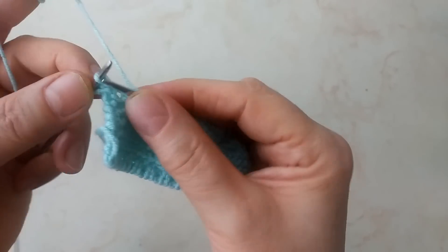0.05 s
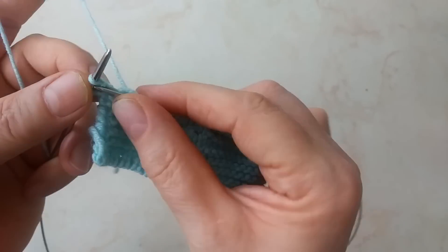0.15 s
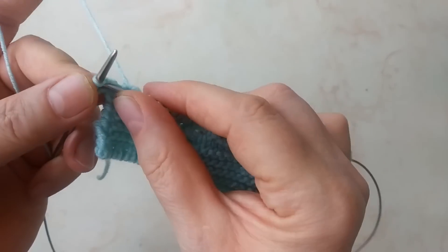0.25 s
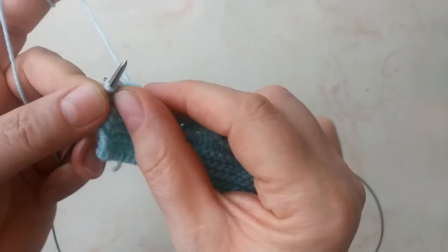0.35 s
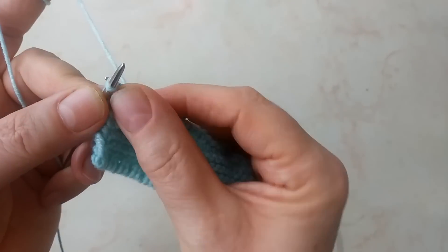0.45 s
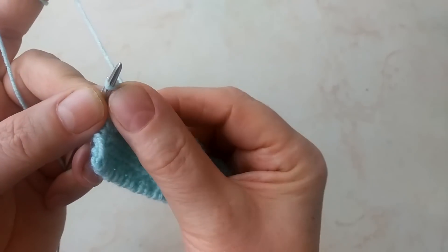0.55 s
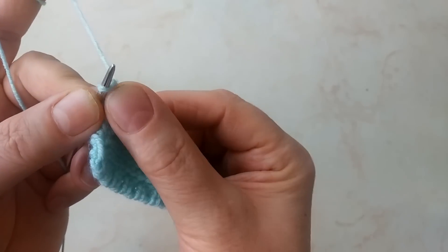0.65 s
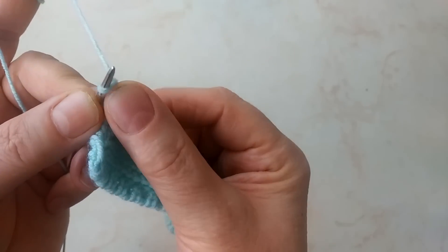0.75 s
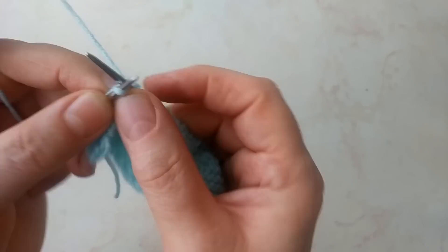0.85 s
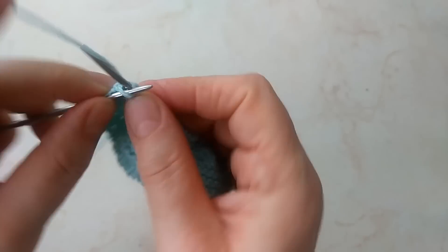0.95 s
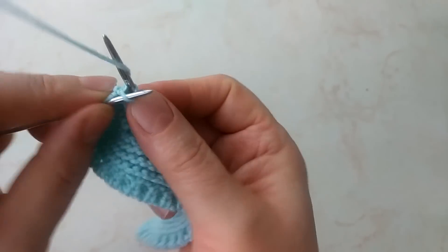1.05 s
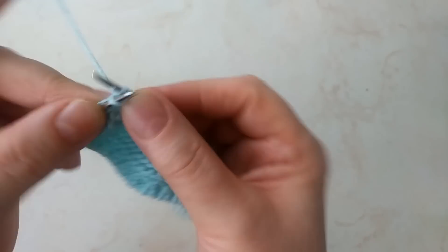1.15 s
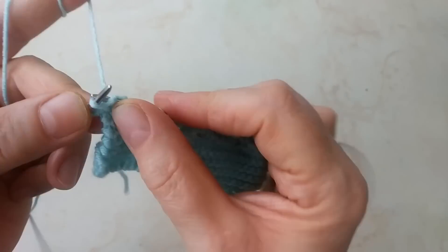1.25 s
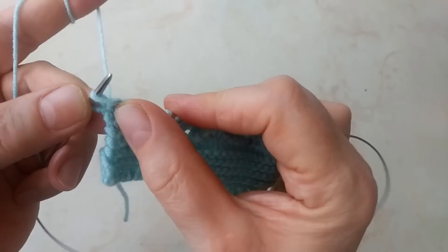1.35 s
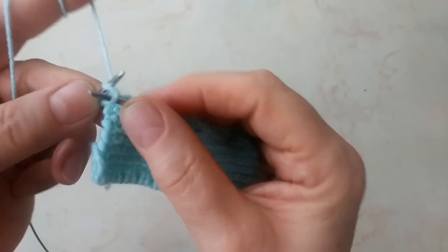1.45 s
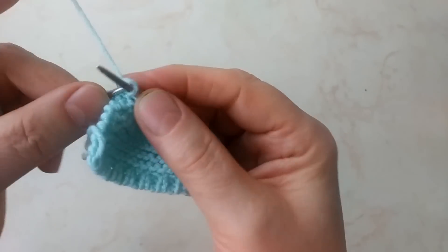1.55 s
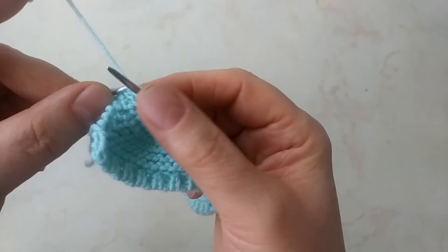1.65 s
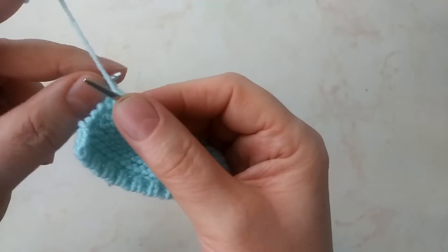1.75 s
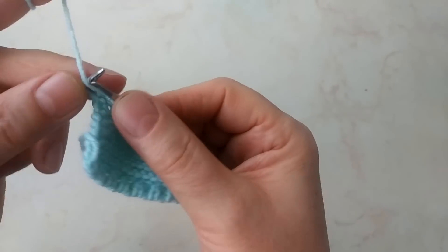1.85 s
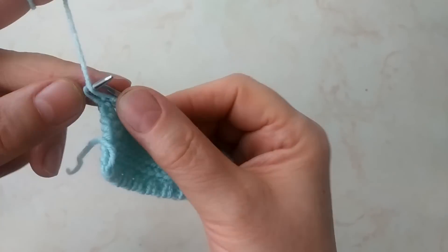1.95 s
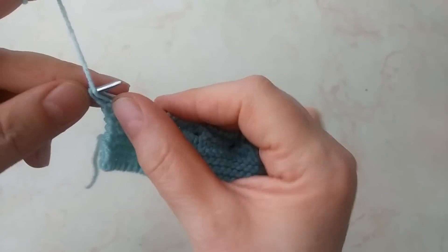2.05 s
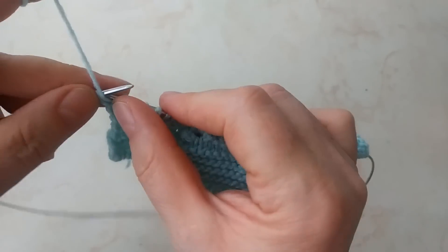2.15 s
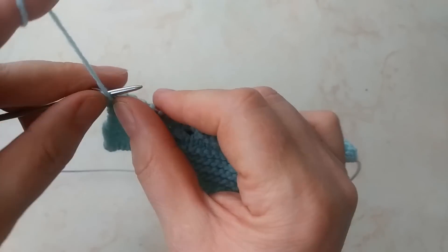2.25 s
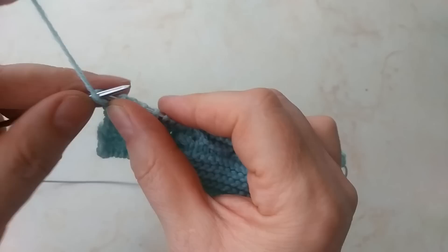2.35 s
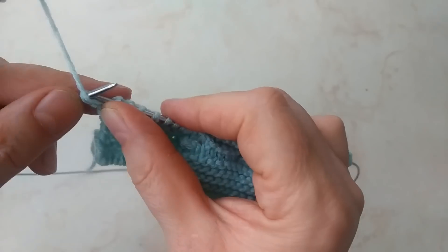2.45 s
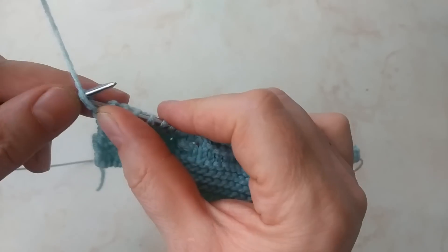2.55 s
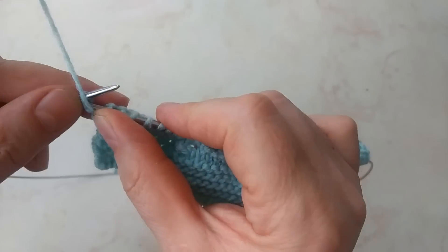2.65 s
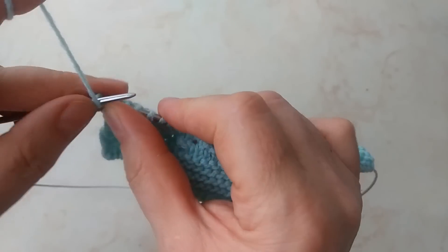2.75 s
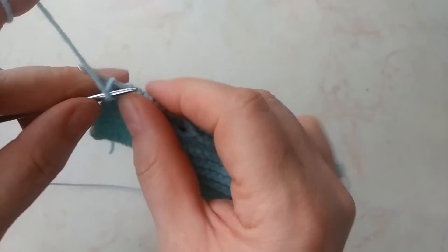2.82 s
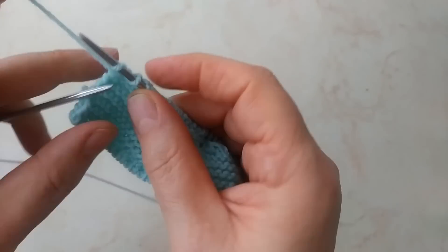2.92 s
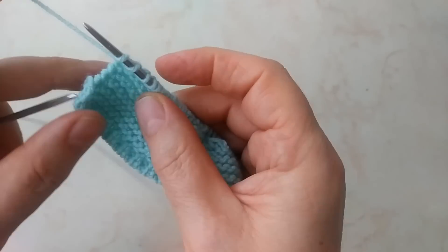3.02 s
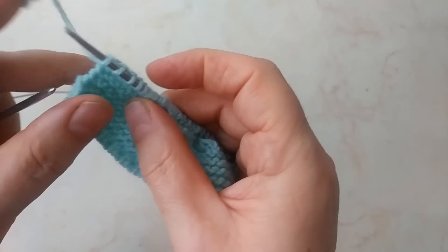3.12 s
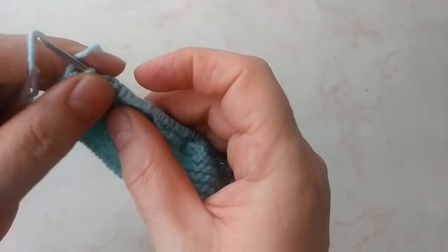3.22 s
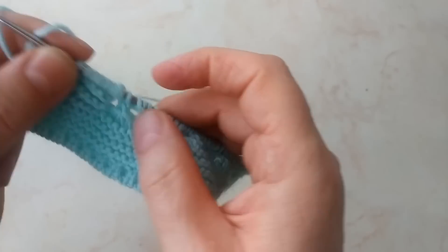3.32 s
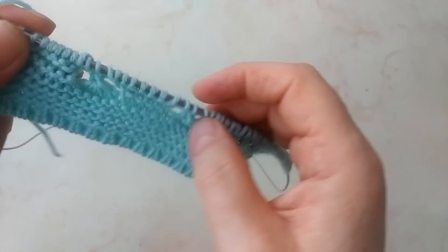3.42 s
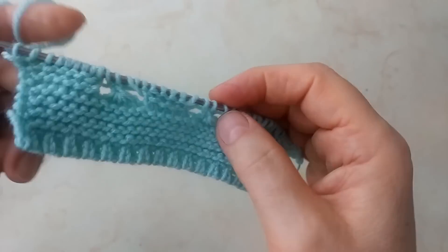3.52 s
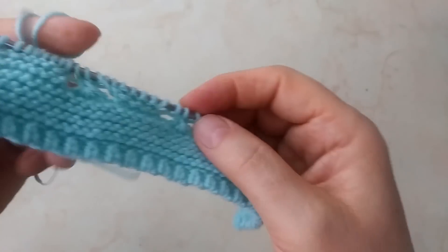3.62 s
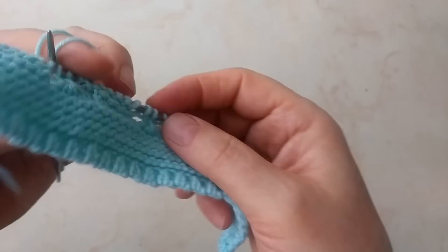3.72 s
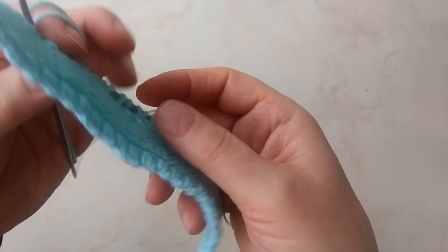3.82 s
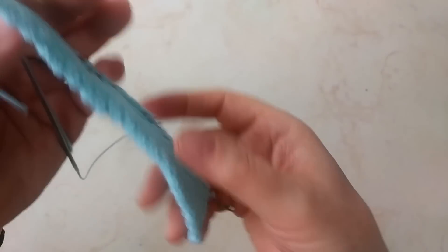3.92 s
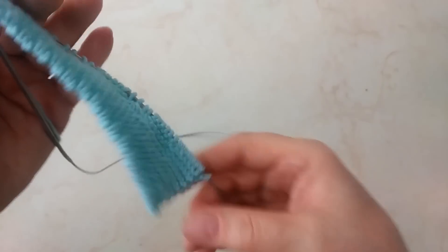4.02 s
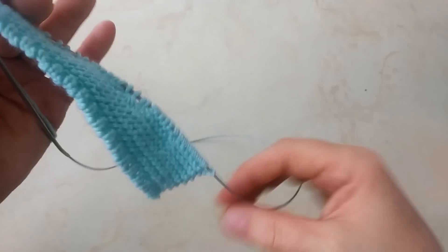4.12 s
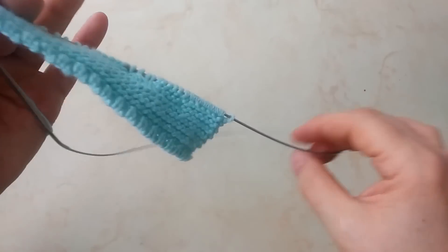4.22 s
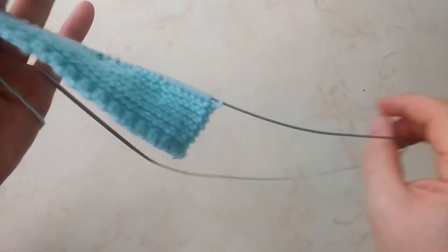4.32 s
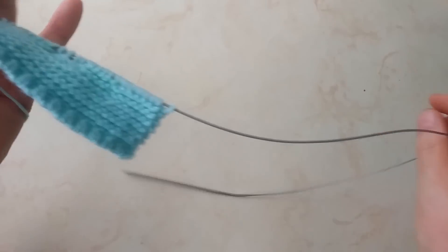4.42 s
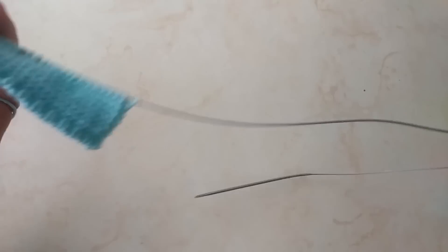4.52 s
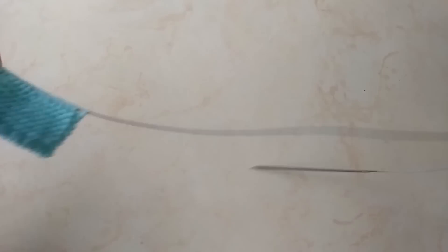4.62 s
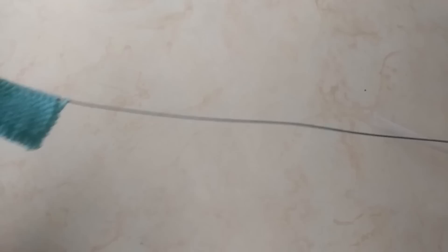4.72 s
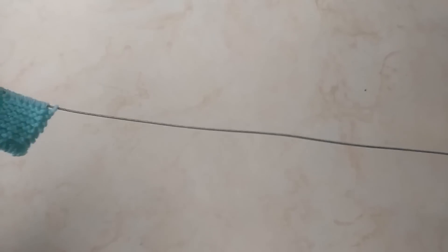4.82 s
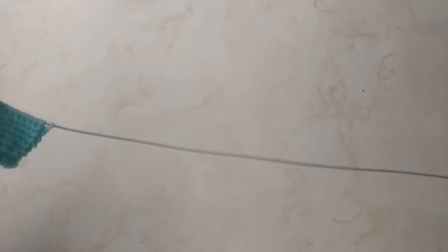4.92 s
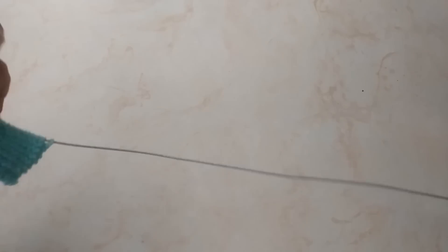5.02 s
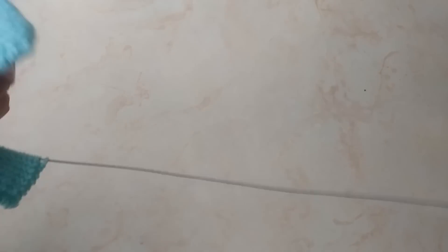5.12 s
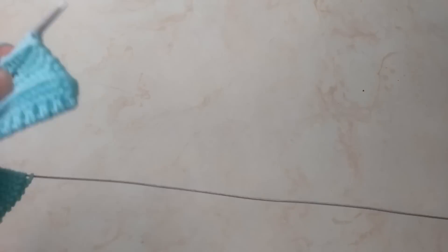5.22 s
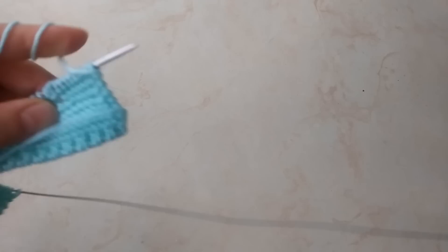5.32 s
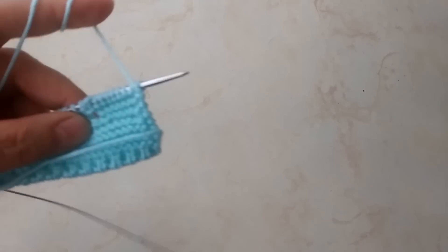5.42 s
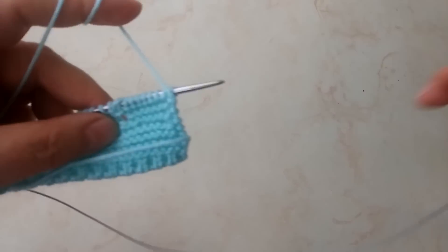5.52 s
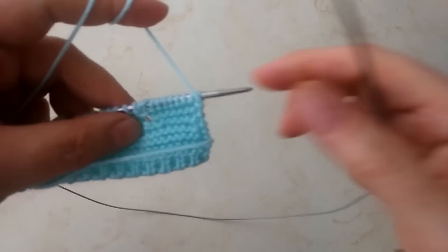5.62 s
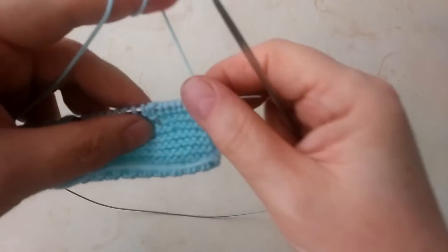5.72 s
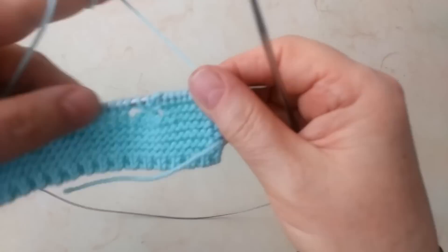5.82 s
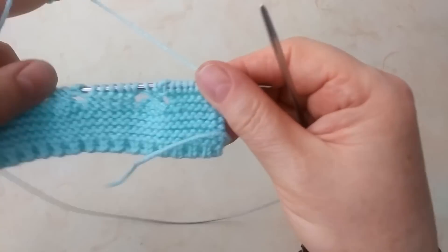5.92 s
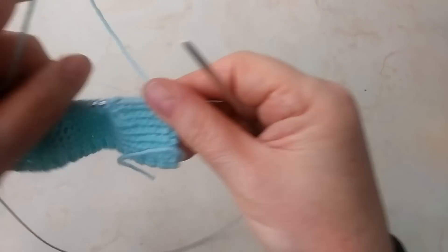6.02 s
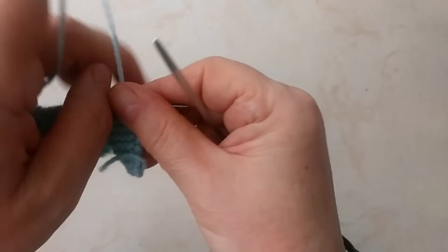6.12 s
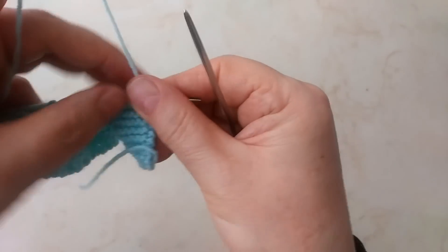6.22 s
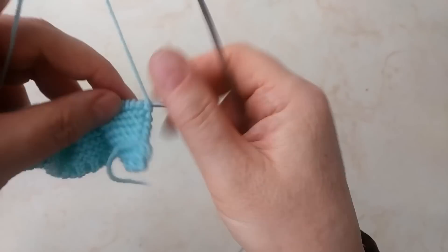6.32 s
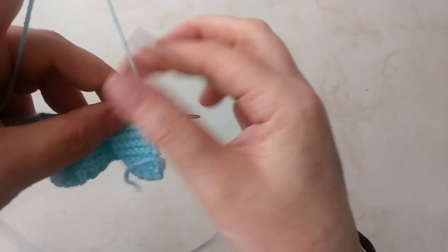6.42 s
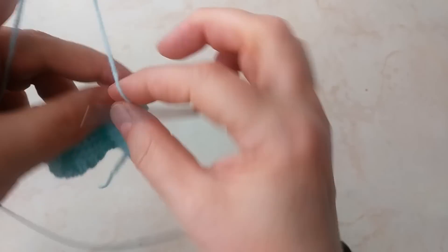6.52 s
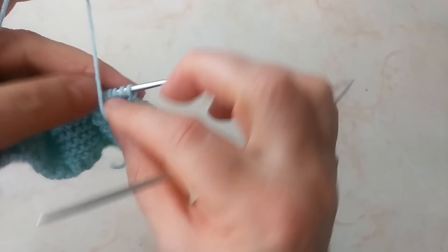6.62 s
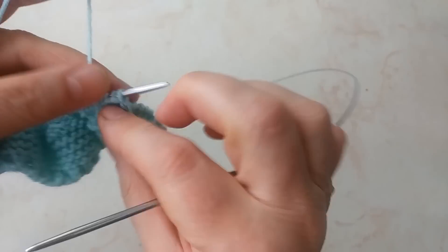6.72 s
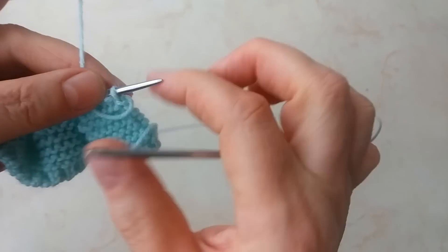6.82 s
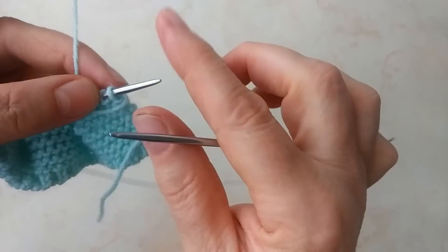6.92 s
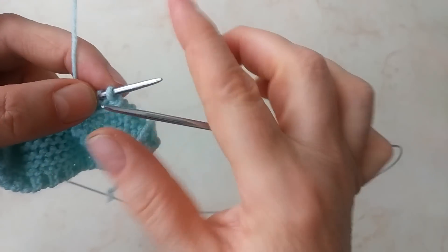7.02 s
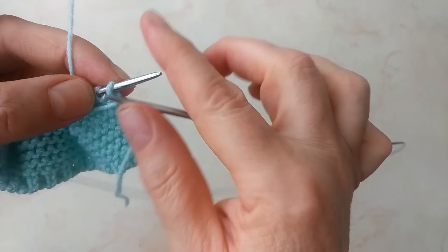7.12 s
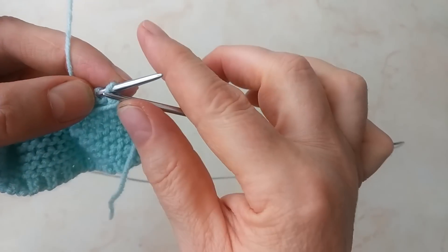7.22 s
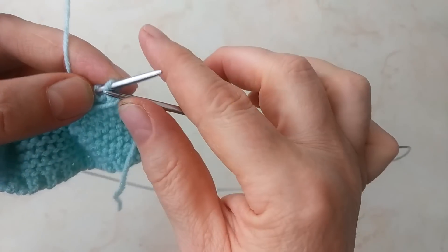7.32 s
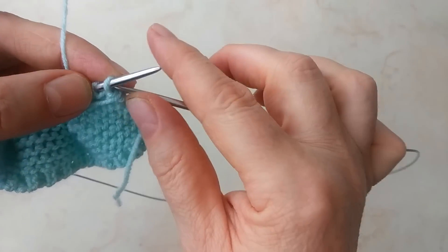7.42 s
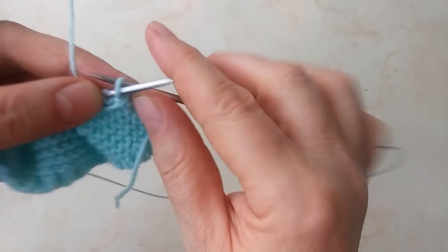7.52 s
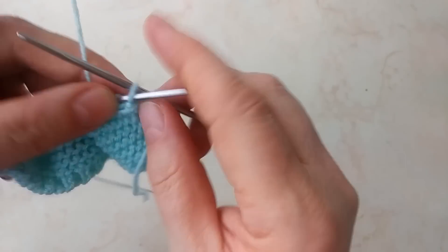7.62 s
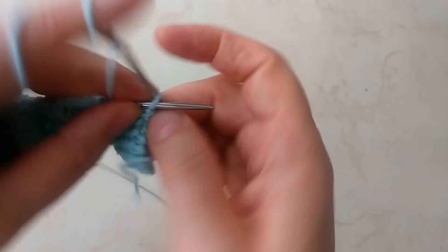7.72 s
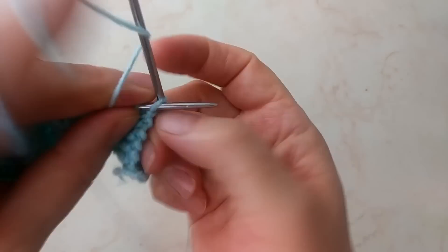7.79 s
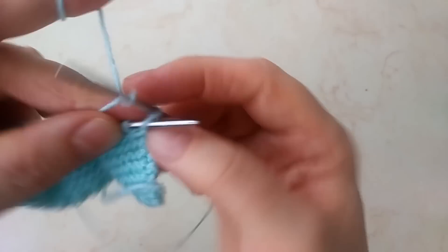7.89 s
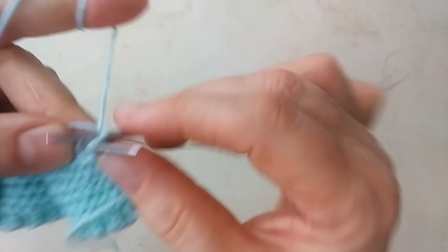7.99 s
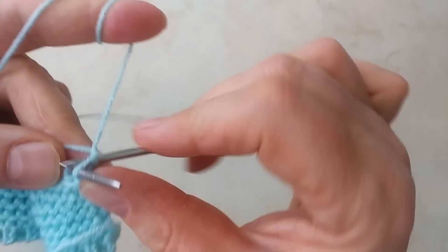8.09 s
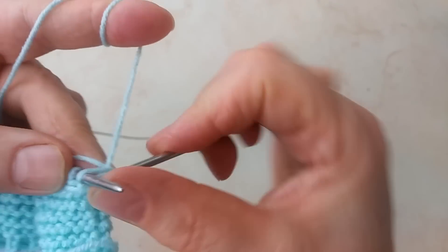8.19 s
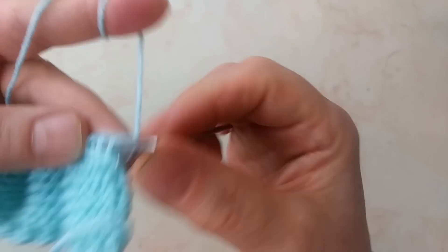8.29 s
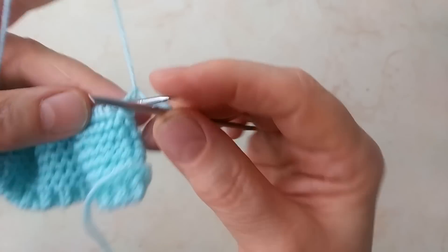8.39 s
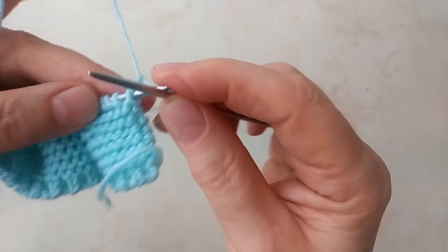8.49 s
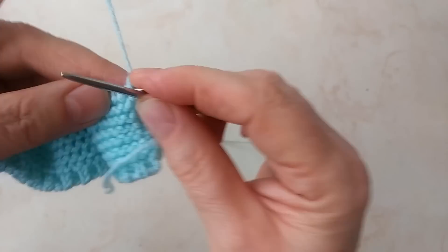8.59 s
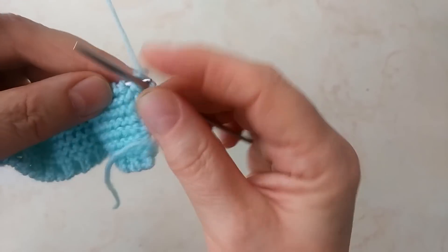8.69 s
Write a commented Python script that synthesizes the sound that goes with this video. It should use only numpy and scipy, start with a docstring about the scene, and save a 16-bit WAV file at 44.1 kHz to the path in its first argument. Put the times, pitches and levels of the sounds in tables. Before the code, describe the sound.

Close, quiet knitting in a small room with a low steady hum. Soft grainy yarn rubs and faint metallic clicks come first. Midway a free steel needle tip drops on the table with a sharp, ringing clatter, far louder than the rest, bounces and is dragged off with a thin hollow scrape. After a near-quiet pause, a short creak of rapid ticks leads back to rubbing, clicks and snapping stitches.

```python
"""Knitting on a circular metal needle above a table, in a small room with a low steady hum throughout.
First yarn rubs along the needle as filtered grainy noise, and the tips snap and click as short bursts.
Then the free tip drops on the table with ringing blows, bounces, and is dragged away by its cable: a
scrape with a comb-like echo. Last the cable creaks through the stitches in a run of fast ticks, as they
are pushed along, and the knitting goes on."""
import sys
import numpy as np
from scipy import signal
from scipy.fft import rfft, irfft
from scipy.io import wavfile
from scipy.ndimage import uniform_filter1d

SR = 44100
rng = np.random.default_rng(int(sys.argv[2]) if len(sys.argv) > 2 else 0)


def to_wav(sig):
    """Store sig (one row per channel, or 1-D mono) as 16-bit WAV at the path in sys.argv[1].

    Samples outside -1..1 are clipped; the rate is SR.
    """
    pcm = np.clip(np.atleast_2d(sig), -1, 1) * 32767
    pcm = np.round(pcm).astype(np.int16)
    wavfile.write(sys.argv[1], SR, pcm.T)  # frames by channels


N = 385875
TIME = np.arange(N) / SR  # s

# All levels in the tables are relative: the layers add their own gain.
# tip meets tip: [t/s, level/dB, brightness/dB per octave, left-right/dB, room/dB]
CLICKS = [(.6045, -36.5, -6, 1, -9), (1.1187, -28.5, 2, 5, 9), (1.1205, -30.5, 1, -18, -3),
          (1.2656, -29.5, 5, 1, 1), (1.2705, -32, -3, -1, -1), (2.2885, -37, 1.5, 15, 0.5),
          (2.2898, -37, 0, -16, 3), (2.7945, -32, 0.5, -2, 3.5), (3.126, -37, -2, 0, 5),
          (5.5107, -28.5, 8, 6, 3), (5.5125, -32, 1, -4, 5), (6.157, -38.5, 4, 0, 5.5),
          (6.3375, -30.5, -0.5, 0, 1.5), (7.5335, -28, -1, -3, 2), (8.165, -39.5, -3, -2, 3.5),
          (8.1695, -41, -6, 8, -6)]
# short resonances of a needle held in the fingers: [f/Hz, width/Hz, lift or cut/dB]
HELD = [(1750, 160, 3.5), (2390, 250, 3.5), (4860, 280, -4.5), (5350, 300, 0), (7500, 400, 5),
        (8300, 230, 7), (9900, 400, 5.5), (10900, 230, 5)]
# a stitch slips over a tip: [t/s, level/dB, brightness/dB per octave, left-right/dB, chatter after it/dB]
SNAPS = [(0.0944, -38, 1, 3, -20), (1.956, -35, 4, 8, -20), (3.9434, -52, 0, 0.5, -20),
         (4.118, -46, -2, 5, -20), (5.0012, -40, 2, 2, -20), (6.758, -36.5, 8, 1, -18),
         (7.418, -32, 7, -1, -13), (7.957, -32.5, 6, 0, -7), (8.2294, -37.5, 2, 1, -2),
         (8.372, -27, 16, 4, -6)]
# one pull of yarn along a needle: [t/s at its fastest, speeding up/s, slowing down/s, hiss level/dB,
# body relative to the hiss/dB, centre of the body f/Hz]
PULLS = [(.015, 0.11, 0.093, -57, -4.5, 2800), (.455, 0.081, .083, -66, 3.5, 2430),
         (.78, 0.006, 0.11, -67.5, 4, 2920), (.865, 0.082, 0.16, -59, -2, 3460),
         (.965, 0.055, 0.031, -54, -5.5, 3470), (1.44, 0.15, 0.18, -58.5, -4, 2700),
         (1.79, 0.068, 0.032, -67.5, 1, 2800), (1.96, 0.057, 0.044, -61.5, 1.5, 3230),
         (2.08, 0.079, 0.044, -52, -7, 2760), (2.925, 0.018, 0.043, -71, 5, 3400),
         (2.98, 0.11, 0.08, -57.5, 1, 3600), (3.025, 0.06, 0.035, -54.5, -2.5, 2490),
         (3.335, 0.19, 0.084, -61.5, -7.5, 2780), (3.53, 0.046, 0.16, -68, 1, 2700),
         (3.84, .15, .08, -71.5, 1.5, 2470), (3.95, 0.063, 0.043, -61.5, -0.5, 2820),
         (4.055, 0.021, .019, -64.5, 2, 3000), (4.125, 0.025, 0.016, -61, -3, 2430),
         (4.32, 0.045, .03, -68, -31, 3000), (5.895, 0.2, 0.054, -65.5, -6, 3200),
         (5.98, 0.058, 0.096, -57.5, -10, 2600), (6.098, 0.024, 0.026, -65.5, 4, 2300),
         (6.495, 0.053, 0.027, -58, -3.5, 2700), (6.695, 0.017, .02, -63, -30, 3000),
         (7.5, 0.048, .03, -59, -22, 3000), (7.555, 0.019, 0.047, -64, -4, 2200),
         (7.715, 0.065, 0.083, -51, -7.5, 2840), (7.885, 0.057, 0.052, -50.5, -2.5, 3850),
         (8.31, 0.073, 0.051, -58.5, -2, 2520), (8.495, 0.05, 0.04, -58, -3, 2320),
         (8.68, 0.13, 0.31, -61.5, -1, 2670)]
# a needle sings as the other slides on it: [t/s at its fastest, speeding up/s, slowing down/s, level/dB, f/Hz]
SINGS = [(.46, .04, .05, -64.5, 2950), (.795, .025, .1, -66.5, 3100), (.97, .04, .04, -66.5, 2980),
         (3.025, .03, .035, -66, 2600), (6.105, .03, .04, -65.5, 2020), (8.495, .03, .05, -66, 2830),
         (8.5, .03, .05, -68, 2030)]
# one scrape of steel on steel just after a click: [t/s at its fastest, speeding up/s, slowing down/s, level/dB]
SCRAPE = (1.155, .035, .05, -49)
# one pull of the cable through the stitches: [t/s at its fastest, speeding up/s, slowing down/s, level/dB]
CREAK = (5.887, .036, .028, -32)
# the free tip lands flat and rattles: [t/s, level/dB, brightness/dB per octave, left-right/dB, room/dB]
DROPS = [(4.3648, -28, 2, -2, 4), (4.3729, -22, 1, 4, 1), (4.3828, -15, 4, 6, -2), (4.3855, -9, 0, 1, 0),
         (4.3861, -11, 2.5, -3, 2.5), (4.3872, -16.5, 1.5, -6, 3), (4.3883, -13.5, -.5, -4, 5),
         (4.3913, -19, 3, 2, -2), (4.3965, -21, -3, -2, 0), (4.411, -20, 0, -2, -3),
         (4.4295, -25, -1, 1, -4), (4.4465, -27, -1, -1, -4)]
# balance of the landing, band by band: [f/Hz, left-right/dB]
DROP_LEAN = [(500, 0), (1200, 1), (2800, -1), (5000, -3), (9000, .5), (13000, 4)]
# the tip bounces before it settles: [t/s, level/dB, brightness/dB per octave, left-right/dB, room/dB]
BOUNCES = [(4.5098, -2.5, 4.5, 9, -4), (4.5256, -8, 2, 7, -6), (4.5268, -16, 0, -3, -6),
           (4.5360, -21, 0, 4, -6), (4.5637, -11.5, 2, 3, -9), (4.580, -18, 0, 2, -8),
           (4.6268, -22, -1, 1, -8)]
# the tip dragged over the table: [t/s, level/dB, delay of its echo off the table/ms]
SLIDE = [(4.508, -36, .55), (4.55, -37, .55), (4.58, -40.5, .55), (4.61, -40, .53), (4.65, -35.5, .59),
         (4.69, -35, .58), (4.708, -37, .6), (4.74, -49, .6), (4.79, -78, .6)]
# ringing of a steel tip: [f/Hz, level/dB, t60/s]
TIP = [(1897, -8, .45), (1933, -8.5, .45), (2300, -7, .4), (2943, -9, .35), (3345, -6, .35),
       (3516, -9, .35), (4554, -8, .25), (5125, -8, .2), (5500, -8, .3), (7090, 2, .11), (8441, -9, .25),
       (8805, -5, .22), (9106, -7, .22), (10025, -6, .22), (11120, -6, .13), (12840, 8, .11)]
# colours of steel on steel, snaps, landing, bounces and sliding: [f/Hz, level/dB]
CLICK_COLOUR = [(200, -16), (900, -0.5), (2000, 2), (4500, 7.5), (8000, 3.5), (12000, 3.5), (15500, 3.5),
                (18000, -13)]
SNAP_COLOUR = [(200, -19), (1000, -9), (2500, -26), (5000, -3.5), (8000, -0.5), (12500, -6), (15500, -3),
               (18000, -26)]
DROP_COLOUR = [(50, -9), (115, 6), (220, 6.5), (400, 2), (900, -3.5), (2000, 1.5), (3400, 2.5), (4200, 3),
               (5500, 4.5), (7200, 4.5), (10000, 2), (11400, 0.5), (12100, 3), (12900, 3.5), (14200, -7),
               (16500, 6)]
BOUNCE_COLOUR = [(300, -6), (900, -6), (1800, -10), (4200, -20), (5800, -12), (7500, -12.5), (9200, -3),
                 (10200, -6), (11200, -8), (12100, 7), (12900, 0), (13800, -8), (15400, 4)]
SKATE_COLOUR = [(300, -19), (900, -19), (1700, -10.5), (3200, -7.5), (4200, -5), (5000, -6.5), (6200, -7),
                (7800, -1.5), (9300, -8.5), (10200, -6), (11250, 6.5), (12400, -1), (13700, -7), (15300, 3),
                (17000, 4.5)]
# colours of the yarn, its fine hiss and the source of its body: [f/Hz, level/dB]
YARN_HISS = [(1500, -41), (3000, -11), (4500, 1.5), (7500, 1.5), (11000, -2.5), (16000, -5)]
YARN_BODY = [(300, -2), (3000, -8.5), (16000, 5.5)]
# reverberation of the room: [f/Hz, t60/s]
ROOM = [(200, 0.1), (1000, 0.53), (3000, 0.47), (7000, 0.27), (12000, 0.27), (16000, 0.018)]
# tones of the hum: [f/Hz, level/dB, share that wavers 0-1]
HUM = [(29.4, -70, 1), (48.7, -62, 0.84), (96.5, -73, 0.8), (124, -68, 0.87), (173.8, -70, 1),
       (199, -62, 0), (254.6, -67, 0.4), (346, -72.5, 0.53), (362.8, -69, 0.83), (382, -65.5, 0.85),
       (471.4, -74.5, 0.84), (517.7, -71.5, 0.96)]
# room noise common to both sides, and differing between them: [f/Hz, level/dB]
AIR = [(10, 6), (22, 3), (45, -0.5), (85, -7.5), (140, -5), (220, -2.5), (300, -5.5), (380, -7.5),
       (550, -9), (750, -15.5), (1400, -23.5), (3000, -29), (12000, -30.5), (16000, -32)]
AIR_SIDE = [(10, 5), (25, -1), (100, -12), (250, -9), (550, -12), (1000, -19), (2000, -24.5), (5000, -29),
            (12000, -28.5), (16000, -30.5)]

STROKE_DEPTH_DB, STROKE_ROUNDNESS = 16.5, 1.78  # every stroke swells from this far below its top, in one arch
BODY_Q = .9  # sharpness of each of the two filters that shape the body of a rub
SING_WIDTH_HZ = 170  # width of each of the two filters that make a needle sing, damped by the fingers
SLIPS_PER_S = 490  # slips of the cable at its fastest moment
TABLE_ECHO = .65  # share of the direct sound
MERGE_S = .04  # time that the reflections need to merge into a smooth tail
EDGE_HZ = 15850  # top of the band that is heard


def yarn(hiss_db=-1, body_db=2.0, pan_db=-1):
    """Fibres drag over steel: a fine hiss, and a soft body whose pitch differs from pull to pull."""
    fizz = friction(YARN_HISS, grains_per_s=900, alike=1.1, patchy_db=2.6, jerk_db=1.8)
    fibres = friction(YARN_BODY, grains_per_s=600, alike=1.0, patchy_db=2.2, jerk_db=2)
    rub = np.zeros((2, N))
    for s, rise_s, fall_s, db, dull_db, body_hz in PULLS:
        stroke = swell(s, rise_s, fall_s, db)
        near = stroke > 0
        body = resonate(fibres[:, near], body_hz, BODY_Q)
        rub[:, near] += stroke[near] * (amp(hiss_db) * fizz[:, near] + amp(dull_db + body_db) * body)
    return sides(pan_db) * (rub + amp(-3.5) * room(rub))


def clicks():
    """Tip strikes tip: a short crack, a trace of ringing steel and the room's answer."""
    return amp(6.5) * blows(CLICKS, CLICK_COLOUR, ring_db=-49, crack_s=.0002, chatter_db=-15, chatter_s=.004)


def snaps(level_db=6, room_db=-10):
    """A stitch slips over a tip: very short ticks, close by and nearly dry."""
    out, t = np.zeros((2, N)), np.arange(SR // 25) / SR
    for s, db, tilt_db, pan_db, chatter_db in SNAPS:
        burst = contact(t, crack_s=.0007, chatter_db=chatter_db, chatter_s=.005)
        add(out, s, amp(db + level_db) * sides(pan_db) * causal(burst, SNAP_COLOUR, tilt_db))
    return out + amp(room_db) * room(out)


def singing(level_db=0, room_db=-5):
    """Catches of steel on steel excite one narrow resonance, whose pitch depends on where the fingers grip."""
    catches = friction(YARN_BODY, grains_per_s=400, alike=1.2, patchy_db=2, jerk_db=2)
    out = np.zeros((2, N))
    for s, rise_s, fall_s, db, hz in SINGS:
        stroke = swell(s, rise_s, fall_s, db + level_db)
        near = stroke > 0
        out[:, near] += stroke[near] * resonate(catches[:, near], hz, hz / SING_WIDTH_HZ)
    return out + amp(room_db) * room(out)


def scrape(room_db=-3, pan_db=1):
    """One tip scrapes along the other: dense steel catches under a single stroke."""
    steel = friction(CLICK_COLOUR, grains_per_s=3300, alike=.55, patchy_db=2.5, jerk_db=1.5)
    rub = swell(*SCRAPE) * steel
    return sides(pan_db) * rub + amp(room_db) * room(rub)


def cable(level_db=4.5, tilt_db=1, room_db=-5):
    """The cable sticks and slips: the slips speed up and slow down again, and faster ones are stronger."""
    strength = swell(*CREAK)
    speed = np.sqrt(strength / strength.max())
    slips_so_far = np.floor(np.cumsum(SLIPS_PER_S * speed) / SR)
    run, t = np.zeros((2, N)), np.arange(SR // 100) / SR
    for at in np.flatnonzero(np.diff(slips_so_far)):
        burst = contact(t, crack_s=.00018, chatter_db=-22, chatter_s=.001)
        add(run, at / SR, amp(level_db) * strength[at] * causal(burst, SNAP_COLOUR, tilt_db))
    return run + amp(room_db) * room(run)


def landing():
    """The free tip hits the table and rattles: full blows with ringing steel, each band leaning to one side."""
    drops = blows(DROPS, DROP_COLOUR, ring_db=-37, crack_s=.0005, chatter_db=-9, chatter_s=.003)
    return leaning(amp(11) * drops, DROP_LEAN)


def bounces():
    """The tip bounces before it settles: drier blows, hollowed by the echo off the table."""
    hops = blows(BOUNCES, BOUNCE_COLOUR, ring_db=-55, crack_s=.0005, chatter_db=-16, chatter_s=.004)
    return table_echo(amp(7) * hops)


def skate(room_db=-8, pan_db=0):
    """The fallen tip skates away, catching unevenly on the table."""
    s, db, _ = np.transpose(SLIDE)
    catches = friction(SKATE_COLOUR, grains_per_s=1800, alike=.8, patchy_db=2.3, jerk_db=1.6)
    slide = table_echo(envelope(s, db) * catches)
    return sides(pan_db) * slide + amp(room_db) * room(slide)


def hum(air_db=-56.0, side_db=-60.0, pan_db=-1.0):
    """Motor and mains tones, most of them wavering, in the steady noise of the room."""
    tones, slow_t = np.zeros(N), np.arange(1024) / 100
    # slow complex noise, mostly below 6 Hz, moves the strength and phase of each tone
    drift_band = 1 / (1 + (np.fft.fftfreq(len(slow_t), slow_t[1]) / 6) ** 2)
    for hz, db, share in HUM:
        share = np.clip(share, 0, 1)
        drift = unit(np.fft.ifft(drift_band * np.exp(2j * np.pi * rng.random(len(slow_t)))))
        strength = np.interp(TIME, slow_t, np.sqrt(1 - share) + np.sqrt(share) * drift)
        carrier = np.exp(2j * np.pi * (hz * TIME + rng.random()))
        tones += amp(db) * np.sqrt(2) * (strength * carrier).real
    mid = tones + amp(air_db) * coloured(rng.standard_normal(N), AIR)
    side = amp(side_db) * coloured(rng.standard_normal(N), AIR_SIDE)
    return sides(pan_db) * np.array([mid + side, mid - side])


def blows(rows, colour, ring_db, crack_s, chatter_db, chatter_s):
    """Each blow cracks, rings the steel tip and sets off the room."""
    out, t = np.zeros((2, N)), np.arange(SR // 2) / SR
    impulse = np.tile(signal.unit_impulse(len(t)), (2, 1))
    for s, db, tilt_db, pan_db, room_db in rows:
        ring = np.zeros((2, len(t)))
        for hz, mode_db, t60 in TIP:
            phase = rng.uniform(0, 2 * np.pi, (2, 1))
            ring += amp(mode_db - 60 * t / t60) * np.sin(2 * np.pi * hz * t + phase)
        direct = contact(t, crack_s, chatter_db, chatter_s) + amp(ring_db) * ring
        # the reverberation comes from all around, so it leans less to one side
        heard = direct * sides(pan_db) + amp(room_db) * room(impulse) * sides(pan_db / 2)
        add(out, s, amp(db) * causal(heard, colour, tilt_db))
    return out


def contact(t, crack_s, chatter_db, chatter_s):
    """One crack for both sides, with the fainter chatter of the surfaces and their nearest reflections."""
    crack = np.exp(-t / crack_s)
    chatter = amp(chatter_db) * np.exp(-t / chatter_s)
    burst = crack * rng.choice([-1., 1.], len(t)) + chatter * rng.standard_normal((2, len(t)))
    return burst / np.linalg.norm(np.hypot(crack, chatter))


def friction(colour, grains_per_s, alike, patchy_db, jerk_db):
    """Tiny catches over a smooth hiss; the colour shifts as the contact moves, and the grip comes in jerks."""
    sizes = amp(3.5 * np.minimum(rng.exponential(1, N), 2.5))
    grains = unit(sizes * rng.choice([-1., 1.], N) * (rng.random(N) < grains_per_s / SR))
    # the grains are alike on both sides, the hiss is not
    z = signal.stft(alike * grains + rng.standard_normal((2, N)), nperseg=512)[2]
    patches = uniform_filter1d(rng.standard_normal(z.shape[1:]), size=6, axis=0)
    patches = unit(uniform_filter1d(patches, size=6, axis=1))
    rub = signal.istft(z * amp(patchy_db * patches), nperseg=512)[1][:, :N]
    grip = unit(uniform_filter1d(rng.standard_normal(N), size=180))
    return coloured(rub, colour) * amp(jerk_db * grip) / np.sqrt(np.mean(amp(2 * jerk_db * grip)))


def swell(s, rise_s, fall_s, db):
    """Gain of one stroke of the hand: the rubbing grows as it speeds up and dies as it slows down."""
    away = np.maximum((s - TIME) / max(rise_s, .005), (TIME - s) / max(fall_s, .005))
    near, gain = away < 4, np.zeros(N)
    gain[near] = amp(db - STROKE_DEPTH_DB * away[near] ** STROKE_ROUNDNESS)
    return gain


def resonate(x, hz, q):
    """A resonance applied twice, at rms 1."""
    b, a = signal.iirpeak(hz, q, fs=SR)
    return unit(signal.lfilter(b, a, signal.lfilter(b, a, x)))


def held(x):
    """Passes a sound through the short resonances of a held needle."""
    out = x.copy()
    for hz, width, db in HELD:
        out += (amp(db) - 1) * signal.lfilter(*signal.iirpeak(hz, hz / width, fs=SR), x)
    return out


def table_echo(x):
    """The echo off the table follows the tip's sound closely and hollows it like a comb."""
    s, _, delay_ms = np.transpose(SLIDE)
    earlier = TIME - np.interp(TIME, s, delay_ms) / 1000
    return x + TABLE_ECHO * np.array([np.interp(earlier, TIME, side) for side in x])


def room(x):
    """Reflections start sparse and thicken, partly shared by both sides, each band dying at its own speed."""
    age = np.arange(SR // 2) / SR
    density = np.clip((age / MERGE_S) ** 2, .06, 1)
    taps = rng.standard_normal((2, len(age))) + .2 * rng.standard_normal(len(age))
    taps *= (rng.random((2, len(age))) < density) / np.sqrt(density)
    hz, t, z = signal.stft(taps, SR, nperseg=256)
    tail = signal.istft(z * amp(-60 * t / read(ROOM, hz)[:, None]), SR, nperseg=256)[1]
    tail *= 1 - np.exp(-np.arange(tail.shape[1]) / SR / .002)  # soft onset
    return signal.fftconvolve(x, tail / np.linalg.norm(tail[0]), axes=1)[:, :x.shape[1]]


def off_centre(x, count=4):
    """The needles lie a little nearer the right, so the left side hears them a few samples later."""
    return np.array([np.roll(x[0], count), x[1]])


def leaning(x, points):
    """Shifts each band of a stereo sound towards one side."""
    pan_db = read(points, np.fft.rfftfreq(N, 1 / SR))
    return irfft(rfft(x) * amp([pan_db / 2, -pan_db / 2]), N)


def causal(x, points, tilt_db, size=1024):
    """Colours a blow with a minimum-phase filter, which does not smear its attack backwards."""
    hz = abs(np.fft.fftfreq(size, 1 / SR))
    # the tilt pivots at 6 kHz and stays flat below 500 Hz
    log_gain = np.log(amp(read(points, hz) + tilt_db * np.log2(np.maximum(hz, 500) / 6000)))
    taps = np.fft.ifft(np.exp(np.conj(signal.hilbert(log_gain)))).real
    return signal.fftconvolve(x, taps[None] / np.linalg.norm(taps), axes=1)


def coloured(x, points):
    """Gives a long signal a spectrum, at rms 1."""
    return unit(irfft(rfft(x) * amp(read(points, np.fft.rfftfreq(N, 1 / SR))), N))


def read(points, hz):
    """Reads a spectrum on a log-frequency axis."""
    f, value = np.transpose(points)
    return np.interp(np.log(hz + 1), np.log(f + 1), value)


def envelope(s, db):
    """Gain along a level curve, silent outside it."""
    return amp(np.interp(TIME, s, db, left=-150, right=-150))


def amp(db):
    """Decibels to gain."""
    return 10 ** (np.asarray(db) / 20)


def unit(x):
    """Scales to rms 1."""
    return x / np.sqrt(np.mean(abs(x) ** 2) + 1e-20)


def sides(pan_db):
    """Left and right gains."""
    return amp([[pan_db / 2], [-pan_db / 2]])


def add(mix, s, sound):
    """Mixes a stereo sound in at time s."""
    part = mix[:, round(s * SR):][:, :sound.shape[1]]
    part += sound[:, :part.shape[1]]


def scene():
    """Needles, yarn and cable, the tip on the table, and the hum behind them."""
    needles = held(clicks() + scrape()) + snaps() + singing()
    knitting = off_centre(yarn() + needles + cable())
    fallen_tip = landing() + bounces() + skate()
    return knitting + fallen_tip + hum()


def record(dry):
    """Band limit: a steep low-pass removes the highest treble."""
    low_pass = signal.firwin(255, EDGE_HZ, window=("kaiser", 8), fs=SR)
    return signal.oaconvolve(dry, low_pass[None], "same")


dry = scene()
out = record(dry)
to_wav(out)
```